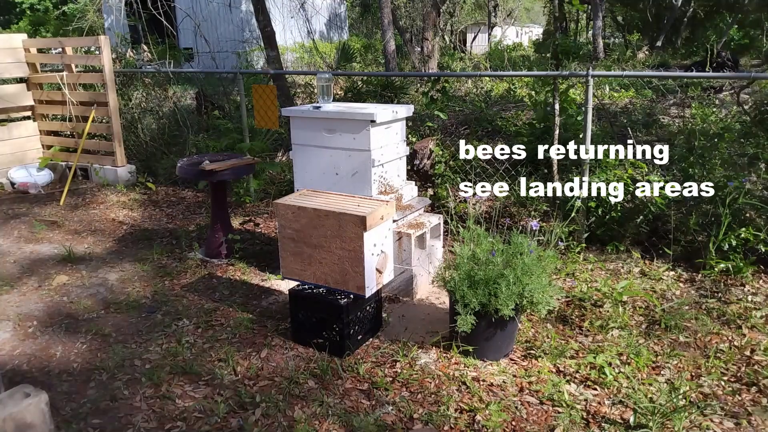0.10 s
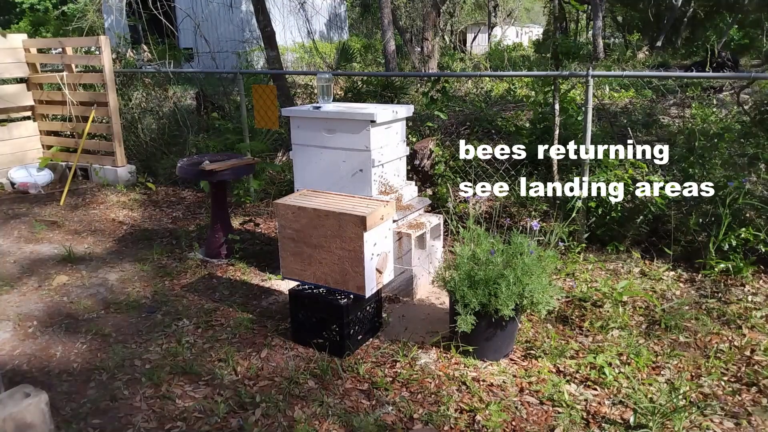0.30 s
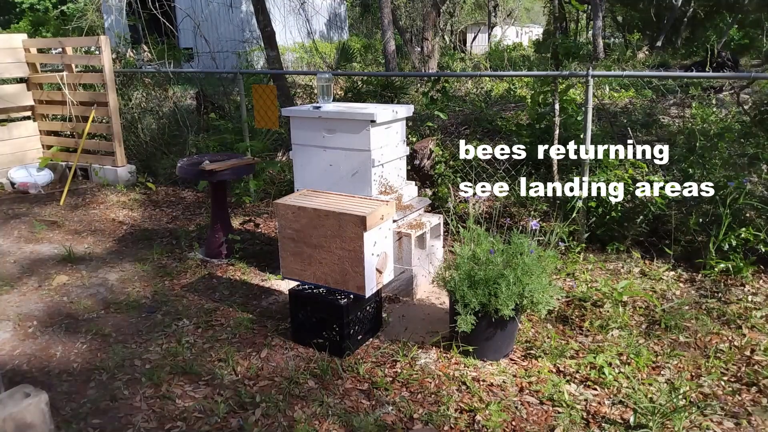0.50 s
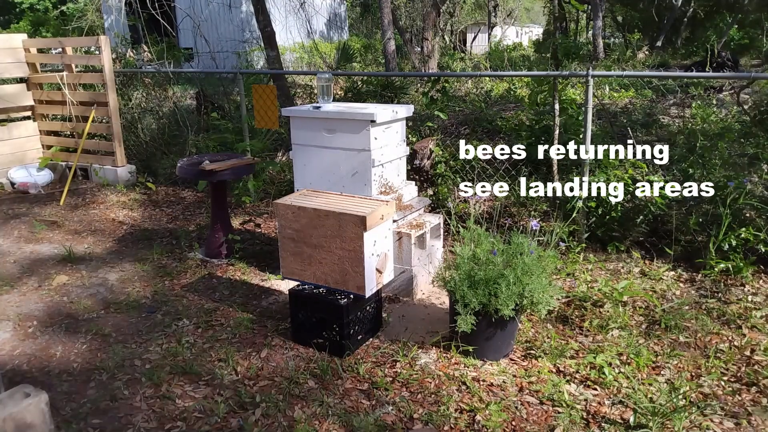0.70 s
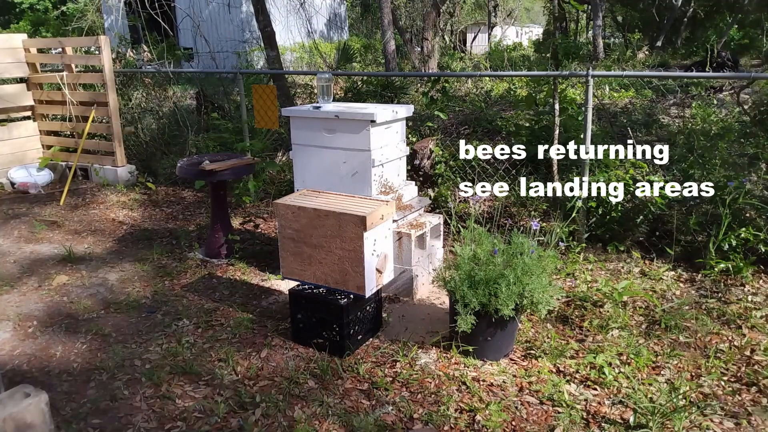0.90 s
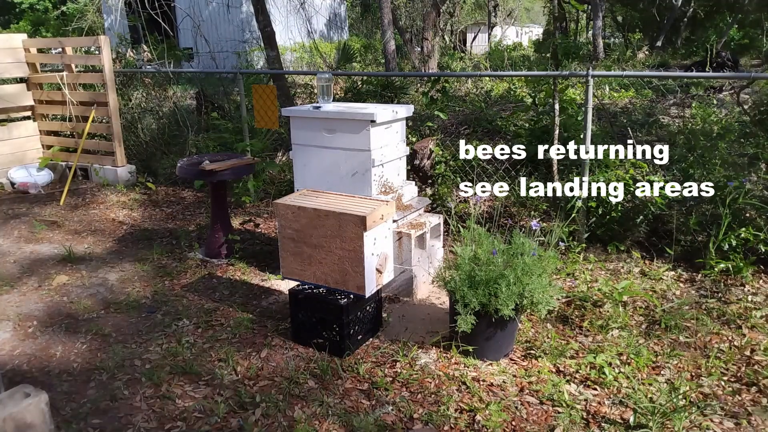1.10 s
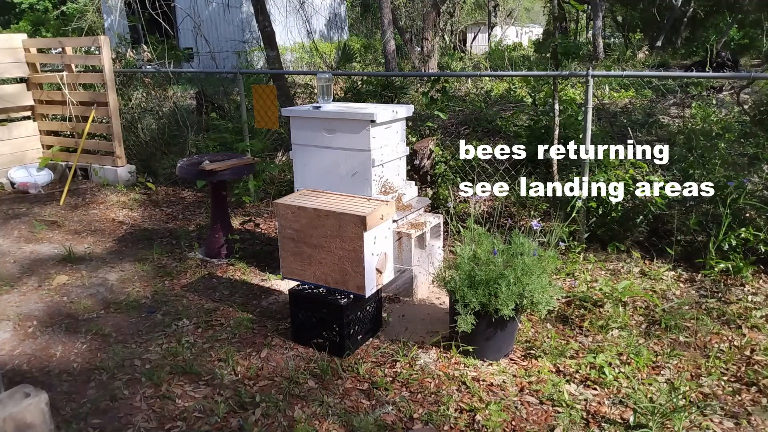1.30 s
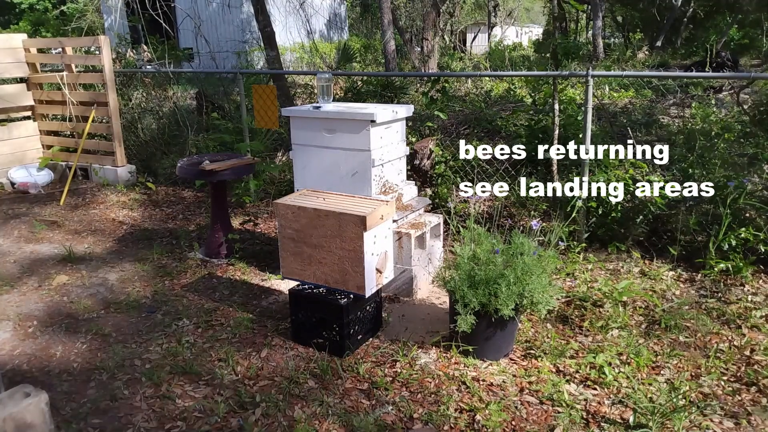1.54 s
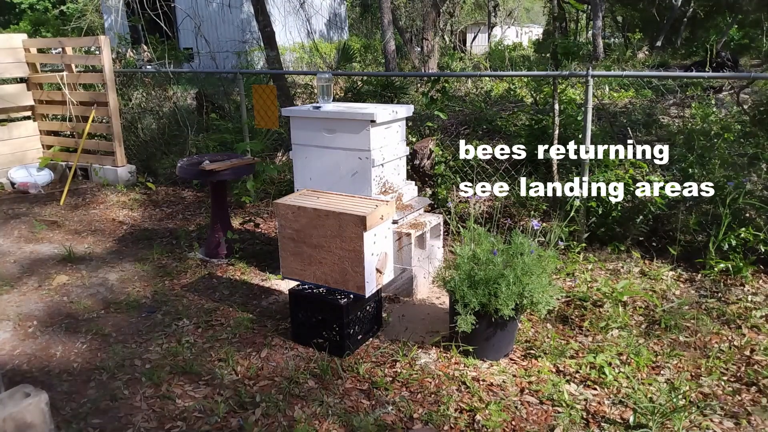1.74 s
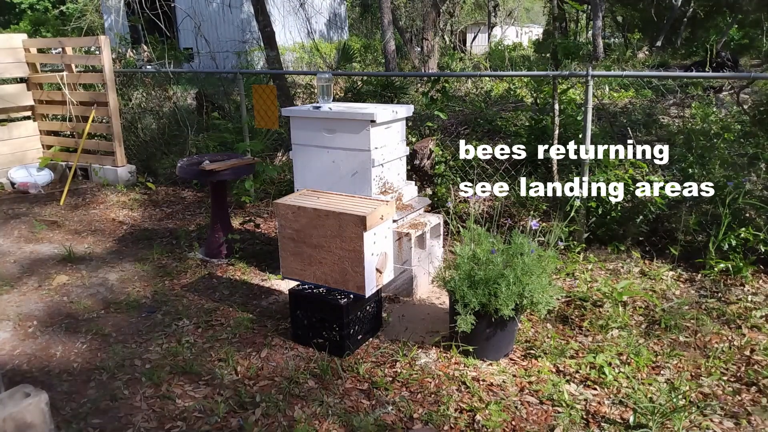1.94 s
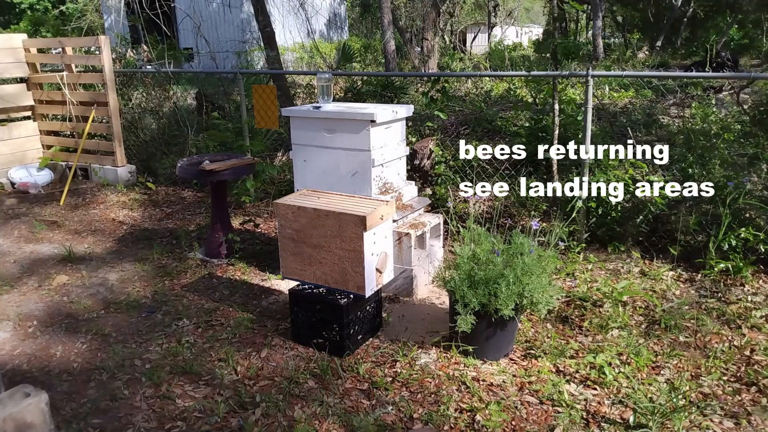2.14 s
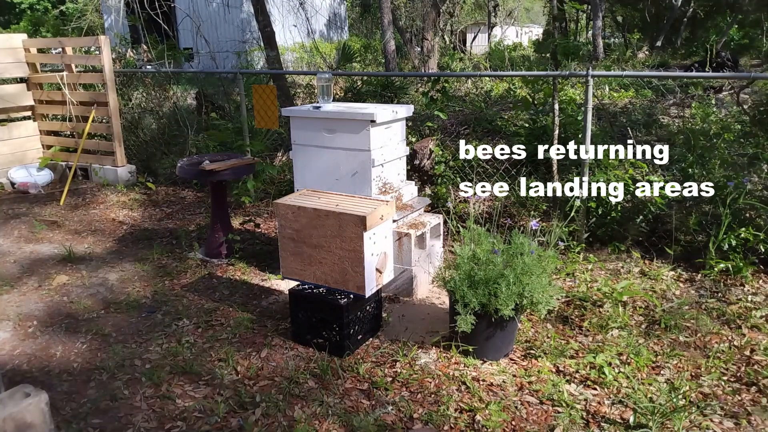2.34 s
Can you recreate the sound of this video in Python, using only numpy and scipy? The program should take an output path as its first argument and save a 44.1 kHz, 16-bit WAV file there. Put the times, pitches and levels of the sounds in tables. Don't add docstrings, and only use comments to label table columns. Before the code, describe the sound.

Bees drone low and wavering throughout, around 260 hertz, beneath quiet, high throbbing cicadas in a leafy yard. From about 0.35 to 0.8 seconds a gust thumps the small recorder's open microphones, strongest at left, with leaf hiss; weaker puffs follow until 1.3. Calm returns. Near 1.9 a soft step rustles dry litter at right, crackling densely to 2.1, then a bright twig snap at 2.12.

```python
import sys
import numpy as np
from scipy import signal
from scipy.fft import rfft, irfft, next_fast_len
from scipy.io import wavfile
from scipy.ndimage import uniform_filter1d, map_coordinates

SR = 44100
rng = np.random.default_rng(int(sys.argv[2]) if len(sys.argv) > 2 else 0)


def level_to_linear(level):
    exponent = np.asarray(level, float) / 20
    return 10 ** exponent


def unload_audio(sound):
    columns = np.transpose(np.atleast_2d(sound))
    steps = np.round(np.clip(columns, -1, 1) * 32767)
    wavfile.write(sys.argv[1], SR, steps.astype(np.int16))


N = 110250
TIME = np.arange(N) / SR
TICK_TIME = np.arange(SR // 40) / SR


def unit(x):
    return x / np.sqrt(np.mean(x ** 2) + 1e-20)


def along(points, hz):
    f, v = np.transpose(points)
    return np.interp(np.log(hz + 1), np.log(f + 1), v)


def curves(rows):
    s, *cols = np.transpose(rows)
    return [np.interp(TIME, s, c) for c in cols]


def wobble(rate, count=1):
    knots = rng.standard_normal((count, int(N * rate / SR) + 4))
    return np.array([map_coordinates(k, [np.arange(N) * rate / SR]) for k in knots])


def filtered(x, response):
    m = next_fast_len(N + SR // 2)
    return irfft(rfft(x, m) * response(np.fft.rfftfreq(m, 1 / SR)), m)[..., :N]


def pan(db):
    return level_to_linear(np.array([db / 2, -db / 2]))


def lagged(pair):
    lag_s = np.array([[0.00016], [0]])
    return filtered(pair, lambda hz: np.exp(-2j * np.pi * hz * lag_s))


def rush(spectrum, alike, patchy_db):
    z = signal.stft(rng.standard_normal((2, N)), nperseg=512)[2]
    field = uniform_filter1d(rng.standard_normal(z.shape[1:]), size=6, axis=0)
    field = uniform_filter1d(field, size=14, axis=1)
    pair = signal.istft(z * level_to_linear(patchy_db * unit(field)), nperseg=512)[1][:, :N]

    def mid_and_side(hz):
        turn = np.arccos(np.clip(along(alike, hz), -1, 1)) / 2
        return level_to_linear(along(spectrum, hz)) * [np.cos(turn), np.sin(turn)]

    mid, side = filtered(pair, mid_and_side)
    return unit(np.array([mid + side, mid - side]))


# (multiple of the wingbeat, level [dB])
WING = [(1, -4), (2, -5), (3, -14), (4, -13), (5, -14), (6, -21.5), (7, -26.5)]
# (time [s], level [dB])
SWARM = [(0, -2.5), (.25, -3.5), (.45, 2.5), (.8, 3), (1.1, -1.5), (1.6, -2.5), (2.1, -1.5), (2.5, -4.5)]
SWARM_DB = -60.5
BEE_TOP_HZ, BEE_SPREAD_HZ = 275, 21
BEE_WANDER, BEE_JITTER = .018, .027
BEE_SWELL_DB, BEE_FLUTTER_DB = 3.2, 3.8
BEE_SCATTER_S = 0.00013


def bees(count=30):
    draw = (np.arange(count)[:, None] + rng.random((count, 1))) / count
    below_top = np.sqrt(draw) * (1 - draw ** 2 * np.log(1 - .95 * draw))
    unsteady = 1 + BEE_WANDER * wobble(2.5, count=count) + BEE_JITTER * wobble(40, count=count)
    hz = (BEE_TOP_HZ - BEE_SPREAD_HZ * below_top) * unsteady
    phase = 2 * np.pi * (np.cumsum(hz, axis=1) / SR + rng.random((count, 1)))
    late = 2 * np.pi * hz * BEE_SCATTER_S * wobble(1.56, count=count)
    both = np.array([phase - late, phase])
    gain = level_to_linear(BEE_SWELL_DB * wobble(4, count=count) + BEE_FLUTTER_DB * wobble(14, count=count))
    gain = gain * pan(-1.2 + 1.1 * wobble(1.5, count=count))
    buzz = sum(level_to_linear(db) * (gain * np.sin(k * both + k * k)).sum(axis=1) for k, db in WING)
    return level_to_linear(SWARM_DB + curves(SWARM)[0]) * unit(buzz)


# (time [s], strength [dB], left minus right [dB])
WIND = [(0, -65, -16), (.1, -56, 9), (.3, -56, -12.5), (.42, -50.5, -1), (.55, -41, 18.5), (.8, -52.5, -10),
        (.97, -53.5, 11.5), (1.04, -61.5, -2), (1.16, -56, 12), (1.21, -49, -5), (1.28, -61, 3),
        (1.6, -68, 2), (2.5, -78, 1)]
# (frequency [Hz], level [dB per Hz])
BUFFET = [(15, -34), (25, -46), (46, -6.5), (103, 0), (150, -10.5), (220, -21), (320, -39.5), (600, -74)]


def rumble():
    strength_db, pan_db = curves(WIND)
    lumps = level_to_linear(0.8 * wobble(18, count=2))
    return level_to_linear(strength_db) * pan(pan_db) * unit(lumps * rush(BUFFET, [(30, 0.28)], patchy_db=3.0))


# (time [s], peak level [dB])
EDDIES_LEFT = [(.111, -43), (.213, -38.5), (.269, -37.5), (.32, -32), (.378, -20.5), (.407, -35.5),
               (.477, -22), (.514, -25), (.545, -21), (.56, -24.5), (.586, -26), (.616, -35), (.672, -39),
               (.694, -29), (.712, -29.5), (.742, -45), (.767, -29), (.838, -36.5), (.962, -38),
               (.986, -30.5), (1.099, -38.5), (1.138, -42.5), (1.197, -34), (1.228, -34.5), (1.25, -40)]
# (time [s], peak level [dB])
EDDIES_RIGHT = [(0.266, -38.5), (0.327, -36), (0.387, -32.5), (0.472, -36), (0.502, -39), (0.529, -31),
                (0.569, -34), (.654, -42), (0.694, -35), (0.731, -34), (0.764, -26.5), (.78, -26.5),
                (0.794, -36.5), (0.896, -41), (1.209, -35.5)]


def eddies():
    colour = lambda hz: level_to_linear(along(BUFFET, hz))
    kicks = np.zeros((2, 2, N))
    for port, rows in enumerate((EDDIES_LEFT, EDDIES_RIGHT)):
        for (s, db), turn in zip(rows, rng.uniform(0, 2 * np.pi, len(rows))):
            kicks[:, port, round(s * SR)] = level_to_linear(db) * np.array([np.cos(turn), np.sin(turn)])
    peak = filtered(np.eye(1, N)[0], colour)[0]
    return (filtered(kicks[0], colour) + filtered(kicks[1], lambda hz: 1j * colour(hz))) / peak


# (frequency [Hz], level [dB per Hz])
LEAVES = [(30, -22), (115, 1), (310, -7.5), (900, -9.5), (2300, -15), (4000, -22.5), (7000, -36),
          (15000, -23)]
# (frequency [Hz], likeness [0-1])
ALIKE = [(60, 1), (270, 1), (740, 0.6), (1200, 0.26), (3000, 0.23), (6000, 0.65)]
# (time [s], lift [dB], half length [s])
PUFFS = [
    (0.395, 6, 0.03),
    (0.484, 5.5, 0.0045),
    (0.575, 3, .02),
    (0.783, 2.5, 0.038),
    (1.0, 5.5, .02),
    (1.25, 7.5, 0.028),
    (1.967, 8.5, 0.023),
]
LEAVES_DB, STILL_DB = -68, -62.5
LEAVES_FOLLOW = 0.41


def leaves():
    strength_db, _ = curves(WIND)
    lift_db = LEAVES_FOLLOW * np.clip(uniform_filter1d(strength_db, size=14000) - STILL_DB, 0, 40)
    for s, db, half_s in PUFFS:
        lift_db = lift_db + db * np.exp(-((TIME - s) / half_s) ** 2)
    level = level_to_linear(LEAVES_DB + lift_db + 1.1 * wobble(7.0))
    return lagged(level * pan(-1.8)[:, None] * rush(LEAVES, ALIKE, patchy_db=1.5))


SNAP_S, SNAP_DB, SNAP_PAN_DB = 2.1203, -21, -15
SNAP_ECHO_S, SNAP_ECHO_DB = .0021, -24
SNAP_RISE_S, SNAP_CRACK_DB, SNAP_CRACK_T60_S = .00015, -7, .011
# (frequency [Hz], level [dB], t60 [s])
TWIG = [(10800, 1.5, 0.0036), (12700, -4, .004), (14600, 1, .004), (4970, -16.5, 0.0047),
        (3680, -22.5, 0.0061)]


def twig_snap():
    t = TICK_TIME
    hiss = unit(np.diff(rng.standard_normal(len(t) + 2), n=2))
    ring = level_to_linear(SNAP_CRACK_DB - 60 * t / SNAP_CRACK_T60_S) * hiss
    for hz, db, t60_s in TWIG:
        ring = ring + level_to_linear(db - 60 * t / t60_s) * np.sin(2 * np.pi * hz * t)
    ring = ring * (1 - np.exp(-t / SNAP_RISE_S))
    hits = np.zeros(N)
    hits[round(SNAP_S * SR)] = 1
    hits[round((SNAP_S + SNAP_ECHO_S) * SR)] = level_to_linear(SNAP_ECHO_DB)
    return level_to_linear(SNAP_DB + np.array([[SNAP_PAN_DB], [0]])) * np.convolve(hits, ring)[:N]


# (time [s], peak level [dB], level of the dull part [dB])
CRACKLES = [(.961, -48, 0), (1.1261, -47, 0), (1.88, -48, -12), (1.8907, -42, -12), (1.9027, -43, -8),
            (1.9067, -45, -8), (1.9235, -46, -6), (1.9356, -40, -14), (1.9635, -47, 2), (1.9672, -46, 0),
            (1.9701, -43, -3), (1.9735, -45, 0), (1.9765, -46, 0), (1.9798, -42, -2), (1.9845, -47, 0),
            (2.0024, -34, -5), (2.005, -45, 2), (2.0105, -41, -3), (2.013, -38, -6), (2.0158, -43, 2),
            (2.019, -46, 0), (2.0226, -44, -3), (2.0279, -39, 1), (2.0315, -38, -1), (2.0345, -46, 0),
            (2.0389, -31, -4), (2.0415, -43, 0), (2.046, -46, -3), (2.052, -45, -3), (2.0573, -35, -4),
            (2.059, -41, 8), (2.0645, -38, -6), (2.0671, -35, -8), (2.0715, -46, -3), (2.0751, -45, -6),
            (2.0892, -39, -6), (2.093, -47, 0), (2.129, -45, -10), (2.181, -48, -6), (2.2661, -48, -6)]
CRACKLE_T60_S, CRACKLE_HZ, CRACKLE_SPREAD_HZ, CRACKLE_TILT_DB = .0065, 3000, 12500, 6.5
SHADOW_DB = -13
LEAF_DIP_HZ, LEAF_DIP_WIDTH_HZ, LEAF_DIP_DB = 6900, 800, -5


def crackles():
    t, ticks = TICK_TIME, np.zeros((2, N + SR))
    draws = rng.random((len(CRACKLES), 2, 10, 1))
    for (s, db, dull_db), (place, strength) in zip(CRACKLES, draws):
        hz = CRACKLE_HZ + CRACKLE_SPREAD_HZ * (np.arange(10)[:, None] + place) / 10
        mode_db = dull_db * (hz < LEAF_DIP_HZ)
        mode_db = mode_db + LEAF_DIP_DB * np.exp(-((hz - LEAF_DIP_HZ) / LEAF_DIP_WIDTH_HZ) ** 2)
        mode_db = mode_db + 10 * strength + CRACKLE_TILT_DB * np.minimum(hz / 9000, 1)
        modes = level_to_linear(mode_db - 60 * t / CRACKLE_T60_S) * np.sin(2 * np.pi * (hz * t + 7 * place))
        far = modes * np.sign(strength - .3) * level_to_linear(SHADOW_DB * hz / 10000)
        tick = np.array([far.sum(axis=0), modes.sum(axis=0)])
        ticks[:, round(s * SR) - 8:][:, :len(t)] += level_to_linear(db + 2.0) * tick / abs(tick).max()
    return ticks[:, :N]


# (frequency [Hz], level [dB per Hz])
LITTER = [(880, -71), (1500, -14), (1900, -8), (2000, -25), (2690, -9), (5600, -6.5), (7320, -16),
          (9010, -9), (16000, -9)]
# (time [s], level [dB])
RUSTLE = [(1.86, -92), (1.9, -57.5), (1.94, -66), (1.972, -53.5), (1.995, -65), (2.03, -58), (2.07, -65),
          (2.11, -96)]


def rustle():
    level_db, = curves(RUSTLE)
    grains = level_to_linear(2.5 * wobble(300)) * rng.standard_normal((2, N))
    grit = unit(filtered(grains, lambda hz: level_to_linear(along(LITTER, hz))))
    return level_to_linear(level_db) * pan(-8.0)[:, None] * grit


STEP_S, STEP_HZ, STEP_DB, STEP_LEN_S = 1.907, 870, -62, .014


def soft_step():
    thud = filtered(rng.standard_normal(N), lambda hz: np.exp(-np.log((hz + 1) / STEP_HZ) ** 2 / 0.11))
    return level_to_linear(STEP_DB) * unit(thud) * np.exp(-((TIME - STEP_S) / STEP_LEN_S) ** 2)


# (start [s], end [s], tymbal tone [Hz], clicks per second [Hz], level [dB])
SINGERS = [
    (.1, .78, 5060, 161, -74),
    (.8, 1.25, 5523, 226, -67.5),
    (1.26, 1.64, 5615, 219, -70),
    (2.13, 2.55, 5432, 214.5, -70),
    (-.1, .7, 10284, 267, -69),
    (.5, 1.5, 9750, 203, -70),
    (1.4, 2.6, 9220, 209, -68),
    (1.5, 2.1, 5190, 214, -72),
]
SIDEBAND_DB, SINGER_FADE_S = -2.2, .06
SINGER_DRIFT_RAD, SINGER_RISE_HZ_PER_S = .9, 60


def singers():
    out = np.zeros((2, N))
    for start, end, hz, rate_hz, db in SINGERS:
        gate = np.clip(np.minimum(TIME - start, end - TIME) / SINGER_FADE_S, 0, 1)
        rise = np.pi * SINGER_RISE_HZ_PER_S * (TIME - (start + end) / 2) ** 2
        drift = SINGER_DRIFT_RAD * wobble(50) + rise
        ladder = 0
        for k in range(5):
            phase = 2 * np.pi * (hz - k * rate_hz) * TIME + drift + np.array([[k], [0]])
            ladder = ladder + level_to_linear(SIDEBAND_DB * k + 3.1 * wobble(24.86, count=2)) * np.sin(phase)
        out += level_to_linear(db) * gate * unit(ladder)
    return out * pan(-5)[:, None]


def chorus(control, early, late, early_hz, late_hz, depth, alike):
    level_db, pan_db, share = curves(control)
    share = np.clip(share, 0, 1)
    mix = 0
    for part, colour, rate_hz in ((1 - share, early, early_hz), (share, late, late_hz)):
        throb = 1 + depth * np.cos(2 * np.pi * rate_hz * TIME + 0.38 * wobble(5.4))
        mix = mix + np.sqrt(part) * throb * rush(colour, [(1000, alike)], patchy_db=0.76)
    return level_to_linear(level_db + 1.18 * wobble(6.95)) * pan(pan_db) * mix


# (time [s], level [dB], left minus right [dB], share of the later trees [0-1])
LOW_CHORUS = [(0, -63, -3.5, 0.15), (.4, -64, -3, 0), (.9, -63.5, -3, 0.3), (1.4, -65, -3.5, 0.88),
              (1.8, -66, -2, 1), (2.5, -63, -2, 1)]
# (frequency [Hz], level [dB per Hz])
LOW_EARLY = [(2240, -48), (3800, -56), (4050, -13.5), (4440, -1), (4990, -1.5), (5250, 2), (5610, -19.5),
             (6200, -13.5), (8060, -32.5), (13600, -120)]
LOW_LATE = [(2240, -12.5), (3800, -11), (4140, -3.5), (4480, 1), (5480, 1.5), (5810, -3), (6060, -41),
            (6200, -29.5), (8060, -43), (13600, -120)]


def low_chorus():
    return chorus(LOW_CHORUS, LOW_EARLY, LOW_LATE, early_hz=269, late_hz=206, depth=0.17, alike=0.29)


# (time [s], level [dB], left minus right [dB], share of the later trees [0-1])
HIGH_CHORUS = [(0, -59.5, -3.5, 0.07), (.4, -60.5, -5, 0.073), (.9, -62, -4.5, 0.16),
               (1.2, -62.5, -7, 0.54), (1.55, -60.5, -6.5, 0.43), (1.83, -65, -8.5, 0.69),
               (2.15, -61.5, -10.5, 1), (2.5, -63.5, -9, 0.81)]
# (frequency [Hz], level [dB per Hz])
HIGH_EARLY = [(4470, -52), (7600, -24), (9330, -1), (9900, 0.5), (11400, -7.5), (12700, -7.5), (14300, -2),
              (15100, -8.5), (16000, -58)]
HIGH_LATE = [(4470, -20.5), (7600, -13.5), (8480, -3.5), (8990, -1.5), (10100, -3.5), (11000, -10.5),
             (12500, -6), (14000, -10), (16000, -22.5)]


def high_chorus():
    return chorus(HIGH_CHORUS, HIGH_EARLY, HIGH_LATE, early_hz=244.0, late_hz=245, depth=0.11, alike=.62)


def scene():
    yard = lagged(bees() + singers() + low_chorus())
    wind = rumble() + eddies() + leaves()
    litter = crackles() + rustle() + soft_step() + twig_snap()
    return yard + wind + litter + high_chorus()


def band_limit(x):
    return signal.sosfilt(signal.butter(12, 16490, fs=SR, output="sos"), x)


def record(dry):
    mix = filtered(dry, lambda hz: hz < 15850)
    return band_limit(mix)


dry = scene()
out = record(dry)
unload_audio(out)
```